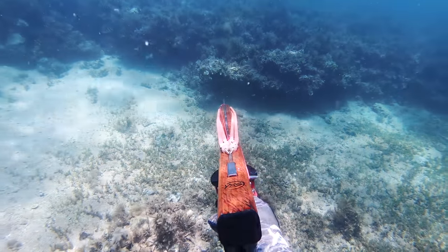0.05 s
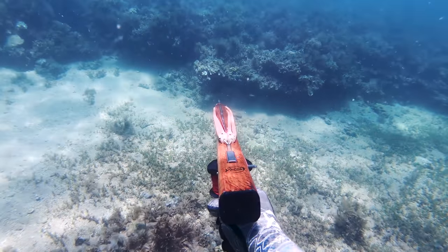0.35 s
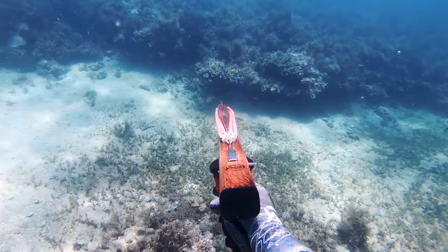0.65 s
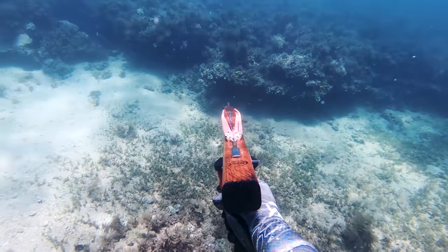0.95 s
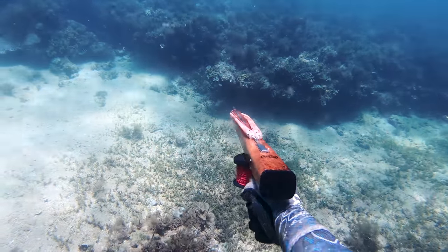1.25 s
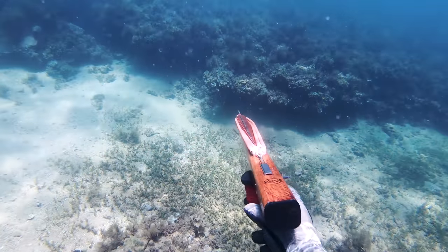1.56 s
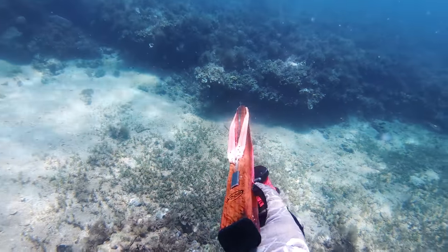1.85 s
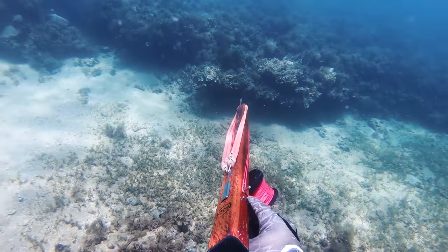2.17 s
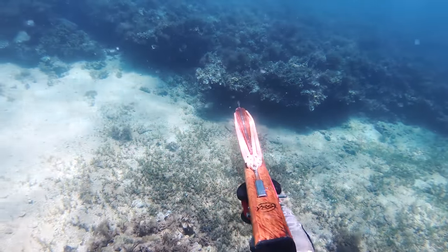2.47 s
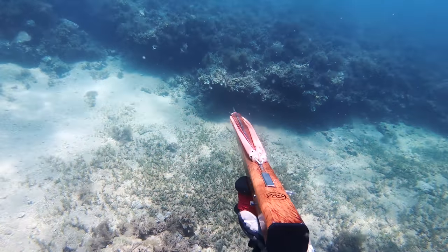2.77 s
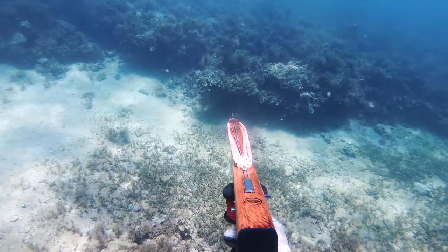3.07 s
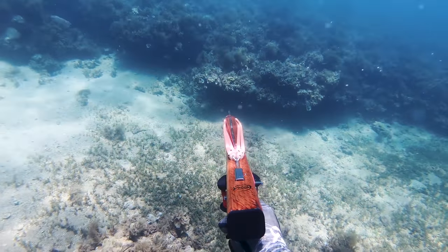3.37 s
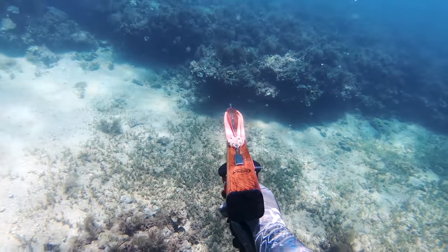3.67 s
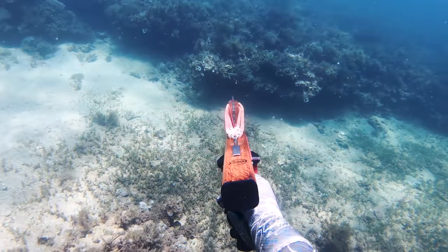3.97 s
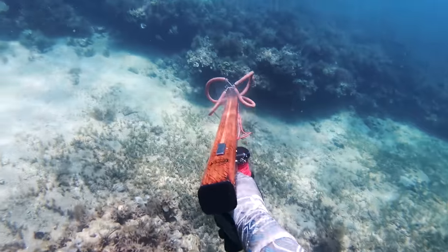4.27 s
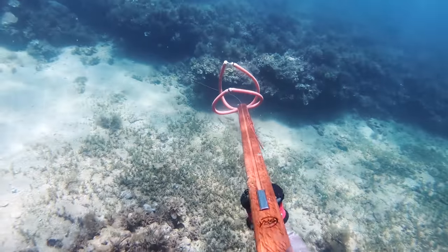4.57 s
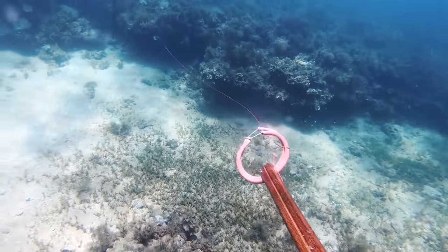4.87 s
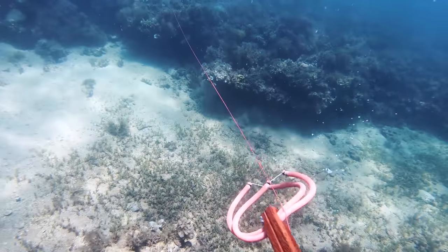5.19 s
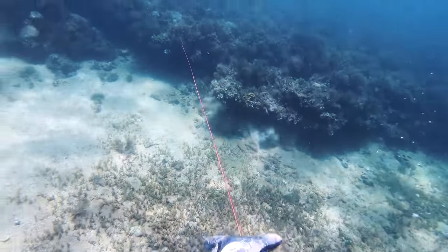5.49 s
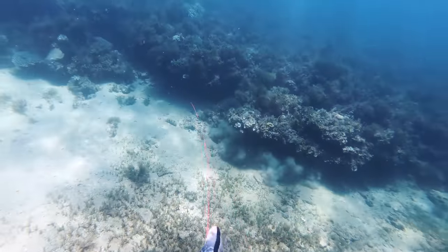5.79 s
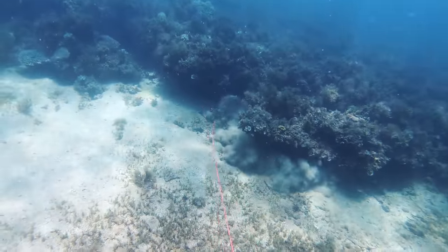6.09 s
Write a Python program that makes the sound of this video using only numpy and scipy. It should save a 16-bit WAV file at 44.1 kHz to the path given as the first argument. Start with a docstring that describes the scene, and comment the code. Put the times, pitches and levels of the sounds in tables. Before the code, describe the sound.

Underwater on a reef, a throbbing whine like a distant boat motor swells over low water rumble and faint snapping shrimp. Muffled bumps, a few clicks and glove scrapes come from handling a speargun. About four seconds in, it fires close by with a sharp crack, a metallic rattle and flapping rubber bands. The whine fades, heavier knocks and churning water follow, and the whine returns at the end, all heard through a sealed housing.

```python
"""Under water on a reef, a speargun is fired close to a camera in a sealed housing.
The trigger cracks, the shaft scrapes off its rail in a fizz of bubbles and the rubber bands flap.
A throbbing whine, like a far boat motor, excites the housing's resonances; it fades after the shot
and returns at the end. A glove sticks and slips on the stock, and the diver's moves bump the housing
and push water round it, more as the gun is drawn back. Shrimp snap by collapsing bubbles."""
import sys
import numpy as np
from scipy import signal
from scipy.fft import rfft, irfft
from scipy.io import wavfile
from scipy.ndimage import uniform_filter1d, minimum_filter1d

SR = 44100
rng = np.random.default_rng(int(sys.argv[2]) if len(sys.argv) > 2 else 0)


def wav_out(sig):
    """Save sig, one row per channel (or a flat mono array), as 16-bit PCM at SR to the path in sys.argv[1]."""
    wavfile.write(sys.argv[1], SR, np.round(np.clip(np.atleast_2d(sig).T, -1, 1) * 32767).astype(np.int16))


N = 275184
TIME, BINS = np.arange(N) / SR, np.fft.rfftfreq(N, 1 / SR)
OCTAVES = np.log2(np.clip(BINS, 1000, 12000) / 1000)  # axis of spectral tilts, 1 to 12 kHz
SHOT_S, CENTRING_S = 4.2705, 0.24  # the trigger lets go; the time handling sounds then take to centre
PLATEAU_DB, RETURN_S, RETURN_RISE_S = -20.0, 6.05, 0.11  # the whine's plateau and late return


# Spectrum of a hard contact: frequency_hz, level_db
CONTACT_SPECTRUM = [(200, -25.5), (600, -17), (850, 2), (1300, -3.5), (1900, -22.5), (2600, -28),
                    (4200, -40.5), (6000, -52), (9500, -65.5), (14000, -93)]
# Resonance of the gun: centre_hz, width_hz, gain_db
GUN_MODES = [(1130, 92, 7)]
# Contacts of trigger, shaft, wishbone and line, each with the struck part's resonance:
# start_s, length_s, peak_db, tilt_db_per_octave, ring_hz, ring_width_hz, ring_db
CONTACTS = [(0.908, 0.0023, -14, 1.5, 2594, 600, 13), (1.254, .016, -24, 4.5, 1467, 348, 10),
            (2.3019, .0005, -4.5, -4.5, 2213, 1000, 15.5), (2.3024, .0005, -6.5, -7, 1222, 90, 14.5),
            (4.268, 0.0026, 0.5, 1, 900, 148.8, 8.5), (4.2703, 0.0018, -2.5, 6, 997, 401, 8.5),
            (4.276, 0.014, -18.5, 3, 910, 201.5, 9.5), (4.287, 0.012, -3.5, -3.5, 1396, 398, 5),
            (4.291, 0.013, -9.5, -5, 546, 220.6, 22), (4.294, .011, -11, -1, 2256, 894, 11.5),
            (4.301, .004, -4.5, -2, 909, 70, 9.5), (4.305, 0.014, -19.5, -1, 1398, 399, 6),
            (4.3532, 0.008, -13.5, -5.5, 1904, 1098, 14), (4.37, 0.013, -27, 5, 895, 202, 9),
            (4.385, .003, -15, -1, 1295, 401, 6), (4.466, .0018, -18.5, -5, 2594, 601, 17.5),
            (4.463, .001, -21, -7.5, 964, 79.3, 11), (5.04, 0.0045, -32.5, 4.5, 1160, 271, 9.5),
            (5.0432, 0.0025, -16, -12, 1128, 45, 18.5), (5.346, 0.012, -53.5, 14.5, 1480, 340, 10.5),
            (5.841, 0.011, -51, 13.5, 3010, 700, 5)]
def clacks(chatter=0.29, density=.6, tick_s=0.0049):
    """Impact excitation: a tick and the chatter of sliding metal ring the gun and the struck part."""
    out, gun_db = np.zeros(N), spectrum(CONTACT_SPECTRUM) + resonances(GUN_MODES)
    for start_s, length_s, peak_db, tilt_db, ring_hz, width_hz, ring_db in CONTACTS:
        count = int(length_s * SR)
        tick = np.exp(-length_s / tick_s)  # long contacts are more rattle than tick
        force = chatter * (1 - tick) * sparse_noise(count, density) * signal.windows.tukey(count, .3)
        force[0] = tick
        response = impulse(gun_db + tilt_db * OCTAVES + resonances([(ring_hz, width_hz, ring_db)]))
        sound = signal.fftconvolve(force, response)
        add(out, start_s, gain_of(peak_db) * sound / abs(sound).max())
    return out


def recoil(flap_every_s=.035, flap_s=.038, flap_hz=122, strongest_s=0.077, fall_db_per_s=177):
    """Reaction: one kick, then the slack bands flap, building and dying. Rows are as in blows()."""
    kick = (SHOT_S, .034, -9, 124, -44)
    flaps = [(SHOT_S + age, flap_s, -17 - fall_db_per_s * abs(age - strongest_s), flap_hz, -np.inf)
             for age in flap_every_s * np.arange(1, 5)]
    return [kick] + flaps


def fizz(level_db=-61.5, fall_db_per_s=174, pops_per_s=2500):
    """Cavitation: tiny bubbles collapse behind shaft and bands in a quickly dying crackle."""
    pops = sparse_noise(N, pops_per_s / SR)
    crackle = unit_rms(convolved(pops, snap(ping_hz=7800, tilt_db=3)))
    return crackle * ramp(SHOT_S, .002) * gain_of(level_db - fall_db_per_s * since(SHOT_S))


# Runs of the line over the gun: start_s, length_s, level_db
LINE_DRAGS = [(5.674, .07, -68), (5.865, 0.12, -67)]
def line(ticks_per_s=400, spread_db=4):
    """Intermittent friction: the line drags over the stock in small, uneven ticks."""
    ticks = np.zeros(N)
    for start_s, length_s, level_db in LINE_DRAGS:
        count = int(length_s * SR)
        strength = gain_of(level_db + spread_db * rng.uniform(-1, 1, count))
        add(ticks, start_s, strength * (rng.random(count) < ticks_per_s / SR))
    return convolved(ticks, snap(ping_hz=7600, tilt_db=0))


# Pace of the throbbing: time_s, rate_hz
THROB_PACE = [(0, 15.55), (.5, 15.95), (1, 16.22), (2.1, 16.25), (2.6, 15.65), (3.2, 15.7), (3.7, 16),
              (4.3, 15.7), (5, 15.97)]
# Spectral envelope of the whine: frequency_hz, level_db
WHINE_SPECTRUM = [(60, -58.5), (230, -38.5), (370, -36.5), (520, -26), (740, -16), (830, -8), (1080, 0),
                  (1200, -3.5), (1560, -4.5), (1830, -27.5), (2700, -34), (4000, -52), (5800, -74),
                  (9000, -81.5), (11000, -92.5)]
# Narrow resonances of the housing: centre_hz, width_hz, gain_db
HOUSING_MODES = [(425.3, 25, 12), (565.2, 113, 16.5), (852.6, 83, 8), (1291.3, 33, 7.5), (2067, 140, 6),
                 (2495, 99, 5.5)]
# Slow change of the whine's upper band and whistle: time_s, relative_db
UPPER_BAND_LEVEL = [(0, -.5), (.9, -0.5), (2.1, -1.04), (2.85, -2.5), (3.2, 1.2), (3.8, 2), (4.3, 2),
                    (6.24, -1.5)]
def whine(upper_hz=(1150, 2000), upper_throb_db=0.95, thin_below_hz=650):
    """Source and filter: a throbbing drive rings the housing; the tone loses bass as it grows faint."""
    throbs = np.cumsum(follow(THROB_PACE)) / SR - .07
    response = impulse(spectrum(WHINE_SPECTRUM) + resonances(HOUSING_MODES))
    body = unit_rms(convolved(whine_drive(throbs), response))
    upper = irfft(rfft(body) / (1 + (upper_hz[0] / (BINS + 1)) ** 8 + (BINS / upper_hz[1]) ** 8), N)
    lower = low_passed(body, thin_below_hz, order=8)
    level_db = whine_level()
    upper_gain = gain_of(follow(UPPER_BAND_LEVEL) - 2.0 - upper_throb_db * np.sin(2 * np.pi * throbs))
    lower_gain = gain_of(np.clip(level_db - PLATEAU_DB, -16, 0))
    balanced = body + (upper_gain - 1) * upper + (lower_gain - 1) * lower
    return gain_of(level_db + 0.3) * (balanced + upper_gain * warble(throbs))


# Band where the chirps stand clear of the churning: centre_hz, width_hz, gain_db
CLEAR_BAND = [(555, 110, 1.5)]
def whine_drive(throbs, pitch_hz=196, harmonics=40, noisiness=1.53, throb_db=1.0, buzz_hz=63.4):
    """Amplitude modulation: chirps grow out of churning noise, and both throb, flutter and buzz."""
    clear_db = resonances(CLEAR_BAND)
    tone = tinted(chirps(throbs, pitch_hz, harmonics), clear_db) * ramp(0, 0.99)
    churn_rms = noisiness * np.sqrt(SR / 2 / (harmonics * pitch_hz))
    churn = churn_rms * tinted(rng.standard_normal(N), -2 * clear_db)
    flutter_db = 1.15 * drift(25)
    buzz = 1 + 0.13 * np.sin(2 * np.pi * buzz_hz * TIME)
    return (tone + churn) * gain_of(throb_db * np.cos(2 * np.pi * throbs) + flutter_db) * buzz


def chirps(throbs, pitch_hz, harmonics, fall=.13, stray=.025, waver=0.01996):
    """Gliding harmonic series: two interleaved trains of falling strokes, each two throbs long."""
    out = np.zeros(N)
    for offset, tune in ((0, 1), (.5, 1.04)):
        position = throbs / 2 + offset + 1.25
        stroke, age = position.astype(int), position % 1
        detune = 1 + stray * rng.standard_normal(stroke.max() + 1)[stroke]
        glide = 1 - fall * (2 * age - .5)
        turns = np.cumsum(pitch_hz * tune * detune * glide * (1 + waver * drift(60.4))) / SR
        phases = rng.random((harmonics, stroke.max() + 1))
        overtones = sum(np.cos(2 * np.pi * (k * turns + phases[k, stroke])) for k in range(2, harmonics))
        out += overtones * np.sin(np.pi * age) ** 2 * (1 - age) ** 2
    return out


# Strength of the whistle within the whine: time_s, relative_db
WHISTLE_LEVEL = [(0, -6), (.6, -6), (1.2, -9), (2.1, -8), (3.3, -9.5), (4.3, -7), (5, -8.5)]
def warble(throbs, pitch_hz=1440, fall_hz=310, stray_hz=35, fuzz_hz=70, lag_throbs=.22):
    """Frequency modulation: one falling whistle a throb, its spectral line broadened by noise."""
    age = (throbs - lag_throbs + .5) % 1
    hz = pitch_hz - fall_hz * (age - .5) + stray_hz * drift(16)
    carrier = np.exp(2j * np.pi * np.cumsum(hz) / SR)
    fuzz = 1 + .45 * (drift(fuzz_hz) + 1j * drift(fuzz_hz))
    return gain_of(follow(WHISTLE_LEVEL)) * unit_rms((carrier * fuzz).real * np.sin(np.pi * age) ** 4)


def whine_level(swell_db=11, swell_s=0.58, drop_db=12.5, dip_db=8.5, dip_s=0.19, return_db=-28.5):
    """Amplitude envelope in dB: a swell, a drop and brief dip at the shot, a fade, a return."""
    age = since(SHOT_S)
    db = PLATEAU_DB - swell_db * np.exp(-TIME / swell_s)
    db -= (drop_db + dip_db * np.exp(-age / dip_s)) * ramp(SHOT_S, 0.015)
    db -= 5 * age + 8.5 * age ** 2  # the fade quickens
    return db + (return_db - db) * ramp(RETURN_S, RETURN_RISE_S)


# Muffled blows on gun and housing: start_s, length_s, boom_db, rub_db
HANDLING_BLOWS = [(0.364, 0.025, -39, -46), (1.246, 0.05, -22.5, -36), (1.437, 0.044, -37.5, -53),
                  (1.73, 0.069, -25, -42.5), (2.033, 0.034, -39, -49.5), (2.302, 0.037, -24.5, -45.5),
                  (2.346, 0.051, -19.5, -51.5), (2.547, 0.05, -22.5, -39.5), (2.662, 0.098, -27.5, -43),
                  (2.778, .08, -34.5, -52), (2.85, 0.046, -31, -47), (2.89, 0.06, -19, -35),
                  (2.932, 0.036, -21.5, -46), (3.787, 0.028, -39, -55), (4.666, 0.038, -31.5, -51.5),
                  (4.808, 0.086, -32, -33), (5.029, 0.083, -35.5, -32), (5.103, 0.0115, -28, -38),
                  (5.139, 0.036, -33, -37), (5.285, 0.029, -32, -36.5), (5.342, 0.058, -11, -27),
                  (5.65, 0.055, -30, -36), (5.8416, 0.00814, -6, -15), (5.876, 0.073, -21, -29.5),
                  (6.139, 0.048, -24.5, -39.5)]
def blows(base_hz=121, loaded_hz=5.2, stiffen_hz_s=0.97, sag_hz_per_db=1.5, heavy_db=-22.5):
    """Short, light blows boom higher. Returns rows of start_s, length_s, boom_db, pitch_hz, rub_db."""
    rows = []
    for start_s, length_s, boom_db, rub_db in HANDLING_BLOWS:
        gun_hz = base_hz + loaded_hz * (start_s < SHOT_S)  # stretched bands stiffen the gun
        pitch_hz = gun_hz + stiffen_hz_s / length_s - sag_hz_per_db * max(boom_db - heavy_db, 0)
        rows.append((start_s, length_s, boom_db, pitch_hz, rub_db))
    return rows + recoil() + bumps()


def bumps(per_s=7, length_s=.03, pitch_hz=101, steepness=1.5, pivot_db=-38, spread_db=4):
    """Random impacts: small bumps grow as a power of the water's flow. Rows are as in blows()."""
    jitter, softness = rng.random((int(per_s * N / SR) - 1, 2)).T
    starts_s = (np.arange(len(jitter)) + jitter) / per_s
    flow_db = np.interp(starts_s, *np.transpose(FLOW_LEVEL))
    typical_db = pivot_db + steepness * (flow_db - pivot_db) + 3.5
    levels_db = typical_db - spread_db * (np.log(softness + 0.026) + 1)
    return [(start_s, length_s, db, pitch_hz, db - 16) for start_s, db in zip(starts_s, levels_db)]


# Rubbing noise within a blow: frequency_hz, density_db
RUB_SPECTRUM = [(100, -17.5), (200, -0.5), (330, 3), (430, -4), (600, -25.5), (800, -37.5), (1200, -51),
                (5000, -120)]
def thumps(sway=0.24, rise=.26, wobble=0.15, roughness=0.22):
    """Damped vibration: each blow swells and dies as a juddering boom with a subharmonic and rubbing."""
    out, rub = np.zeros(N), noise(RUB_SPECTRUM)
    waver, judder = 1 + wobble * drift(90), 1 + roughness * drift(71)
    for start_s, length_s, boom_db, pitch_hz, rub_db in blows():
        span = slice(int(start_s * SR), int((start_s + 3 * length_s) * SR))
        rise_s = rise * length_s
        age = (TIME[span] - TIME[span][0]) / rise_s
        swell = (age * np.exp(1 - age)) ** 1.16
        turns = np.cumsum(pitch_hz * waver[span]) / SR - pitch_hz * rise_s
        boom = judder[span] * (np.cos(2 * np.pi * turns) + sway * np.sin(np.pi * turns))
        add(out, start_s, swell * (gain_of(boom_db - 1) * boom + gain_of(rub_db + 0.5) * rub[span]))
    return out


# Response of the housing to a blow: frequency_hz, gain_db
KNOCK_RESPONSE = [(250, -46), (430, -14.5), (560, 13), (700, 13.5), (900, 10), (1300, 11), (2500, -8)]
def housing_ring(knocks):
    """Forced resonance: blows raise a woody midrange ring, which fades and returns with the whine."""
    return convolved(knocks, impulse(spectrum(KNOCK_RESPONSE))) * gain_of(whine_level() - PLATEAU_DB)


# Scrapes of the glove on the stock: start_s, length_s, level_db, centre_hz
GLOVE_SCRAPES = [(1.232, .045, -36, 525), (1.721, 0.054, -35.5, 473), (2.287, 0.022, -37, 398),
                 (2.553, 0.026, -35.5, 619), (2.661, .03, -35.5, 722), (2.701, 0.023, -33.5, 405),
                 (2.875, 0.044, -25, 777), (2.906, 0.025, -26, 512), (2.917, 0.036, -32, 610)]
def scrapes(slips_per_s=900, relative_width=.6):
    """Stick-slip friction: quick slips of the glove on the wood excite one broad resonance."""
    out = np.zeros(N)
    for start_s, length_s, level_db, centre_hz in GLOVE_SCRAPES:
        count = int(length_s * SR)
        slips = sparse_noise(count, slips_per_s / SR) * signal.windows.tukey(count, .7)
        ring_db = -20 * np.log10(1 + ((BINS - centre_hz) / (relative_width * centre_hz)) ** 4)
        sound = signal.fftconvolve(slips, impulse(np.maximum(ring_db, -90), size=1024))
        add(out, start_s, gain_of(level_db) * sound / np.sqrt(np.sum(sound ** 2) / count + 1e-20))
    return out


# Rubbing of the glove on the handle: frequency_hz, density_db
GRIP_SPECTRUM = [(60, -26), (105, -2), (135, 4), (200, -16.5), (320, -9.5), (480, -15.5), (800, -32.5),
                 (2000, -88)]
# Shifts of the hand's grip: start_s, length_s, level_db
GRIP_SHIFTS = [(.24, 0.16, -45), (1.203, .18, -40), (1.638, 0.21, -42.5), (2.473, 0.31, -43),
               (2.761, 0.27, -42.5)]
def grips(slips_per_s=220):
    """Frictional creep: the glove moves over the handle in uneven slips, a low, rough rubbing."""
    out, slips = np.zeros(N), sparse_noise(N, slips_per_s / SR)
    rubbing = unit_rms(convolved(slips, impulse(spectrum(GRIP_SPECTRUM))))
    for start_s, length_s, level_db in GRIP_SHIFTS:
        stroke = rubbing[int(start_s * SR):int((start_s + length_s) * SR)]
        add(out, start_s, gain_of(level_db) * stroke * signal.windows.tukey(len(stroke), .6))
    return out


# How hard the diver's movement pushes water round the housing: time_s, level_db
FLOW_LEVEL = [(0, -40.5), (.8, -40.5), (1.02, -45), (1.3, -36), (1.55, -36), (1.75, -47), (2.4, -46),
              (3.4, -48), (3.8, -49.5), (4.8, -42.5), (5.45, -37.5), (6.03, -30), (6.24, -38)]
# Rumble, close eddies, gurgle and hiss of the water: frequency_hz, density_db
RUMBLE_SPECTRUM = [(15, 3), (35, 1.5), (65, -5.5), (110, -13), (160, -25.5), (230, -35.5), (500, -70.5),
                   (2000, -130)]
EDDY_SPECTRUM = [(30, -28), (65, -3.5), (100, 2.5), (150, -7.5), (300, -43.5), (1000, -110)]
GURGLE_SPECTRUM = [(40, -23), (110, -2.5), (160, -9), (215, -15.5), (270, 1), (330, -2), (400, -8),
                   (500, -21.5), (590, -7.5), (700, -34.5), (900, -26.5), (1300, -43), (2100, -44),
                   (5000, -110)]
HISS_SPECTRUM = [(1060, -45.5), (1800, -12), (1870, -14), (2050, -11.5), (2160, -23), (2590, -20.5),
                 (2820, -3), (3000, -1.5), (3250, -6.5), (3630, -9), (3950, -19.5), (5140, -53.5),
                 (8690, -120)]
def flow(draw_back_s=4.15, drawn_s=5.75, surge_db=-26, surge_fall_db_per_s=71, eddy_db=-5):
    """Turbulence: lumpy water noise follows the movement and surges with the recoil, over a faint hiss."""
    push_db = follow(FLOW_LEVEL)
    close = ramp(draw_back_s, drawn_s - draw_back_s)  # the gun is drawn back beside the camera
    surge = ramp(SHOT_S, 0.0085) * gain_of(surge_db - surge_fall_db_per_s * since(SHOT_S))
    width = 0.28 * np.array([[1], [-1]]) * (1 - close) ** 2  # narrows to the centre
    rumble = noise(RUMBLE_SPECTRUM) + width * noise(RUMBLE_SPECTRUM)
    rumble += gain_of(eddy_db) * ramp(SHOT_S, CENTRING_S) * noise(EDDY_SPECTRUM)
    rumble *= gain_of(1.96 + 2.4 * drift(39)) * np.hypot(gain_of(push_db), surge)
    gurgle_db = -53 + 12 * close + 0.18 * (push_db - push_db.mean())
    gurgle = noise(GURGLE_SPECTRUM) * gain_of(gurgle_db + 0.39 * drift(25))
    hiss = noise(HISS_SPECTRUM) * gain_of(-94 + 21 * close)
    return rumble + gurgle + hiss


# Snaps of the nearest shrimp: start_s, level_db, ping_hz, tilt_db_per_octave
NEAR_SNAPS = [(0.2662, -50, 3670, -1.5), (0.693, -54, 8600, 0), (0.8594, -61, 3200, 7.5),
              (1.2468, -38, 3650, -1), (1.507, -57, 4700, 2), (1.5247, -50, 3420, 0.5),
              (1.839, -49.5, 3100, -1.5), (1.91, -47.5, 3400, -7), (2.1056, -52, 3500, -5),
              (2.296, -50, 2800, 3), (2.446, -61.5, 8640, 0), (2.488, -38, 4500, -10),
              (2.5391, -57, 6700, -3.5), (3.1824, -60, 3300, -1), (3.6676, -53, 3600, -1.5),
              (3.734, -41, 3930, -9), (3.8721, -49, 4500, -8.5), (4.2605, -55, 6800, -1),
              (4.9144, -66, 3000, -1), (5.03, -66, 4700, -4), (5.933, -59, 3600, 1),
              (5.9924, -62, 3900, -6)]
def shrimp(boost_db=3, rattle=0.41, rattle_s=0.0027):
    """Multipath: near snaps and the reef's crackle reach each channel with a short rattle of its own."""
    out = reef()
    for start_s, level_db, ping_hz, tilt_db in NEAR_SNAPS:
        add(out, start_s, gain_of(level_db + boost_db) * snap(ping_hz, tilt_db))
    paths = rattle * rng.standard_normal((2, 400)) * np.exp(-TIME[:400] / rattle_s)
    paths[:, 0] = 1  # direct arrival
    return np.array([convolved(out, path) for path in paths])


# Spectrum of a collapsing bubble: frequency_hz, level_db
SNAP_SPECTRUM = [(500, -20.5), (1500, -4.5), (2600, 3.5), (4300, 0.5), (5600, -8.5), (7000, -13.5),
                 (9200, -13), (11000, -37.5), (15000, -52)]
def snap(ping_hz, tilt_db, width_hz=1200, ping_db=6.5):
    """Bubble collapse: a broadband click with one resonant ping, at peak 1."""
    ping = resonances([(ping_hz, width_hz, ping_db)])
    sound = impulse(spectrum(SNAP_SPECTRUM) + tilt_db * OCTAVES + ping, size=512)
    return sound / abs(sound).max()


def reef(far_db=-71.5, snaps_per_s=140, spread_db=2.5, clumping=0.92, clump_hz=9, animals=6):
    """Poisson process of drifting rate: far shrimp crackle in clusters; the level follows the whine's."""
    rate = np.exp(clumping * drift(clump_hz))
    fired = rng.random(N) < snaps_per_s / SR * rate / rate.mean()
    level_db = far_db + spread_db * np.minimum(rng.exponential(1, N), 3.5)
    pops = fired * gain_of(level_db + whine_level() - PLATEAU_DB)
    animal = rng.integers(0, animals, N)
    pings_hz, tilts_db = np.geomspace(2500, 5000, animals), 2 * rng.standard_normal(animals)
    return sum(convolved(pops * (animal == k), snap(pings_hz[k], tilts_db[k])) for k in range(animals))


def sea_bed(x, echo_db=-13.5, t60_s=0.068):
    """Scattering: the sea bed adds a short, dense tail."""
    age = TIME[:SR // 4]
    tail = rng.standard_normal(len(age)) * gain_of(-60 * age / t60_s)
    return x + gain_of(echo_db) * convolved(x, tail / np.linalg.norm(tail))


# Phase between the two channels: frequency_hz, left_lead_rad
STEREO_PHASE = [(0, -2.5), (340, 1.94), (600, 2), (1030, 3), (1290, 4), (1810, 4.5), (2070, 4), (2330, 5),
                (2670, 5), (2930, 4.5), (3360, 6), (3700, 7.5)]
# Balance of the two channels: frequency_hz, left_minus_right_db
STEREO_BALANCE = [(60, 3.5), (87, -2.5), (130, -1), (180, 0.5), (260, 0.5), (380, -13), (550, -9), (800, 2),
                  (1150, -0.5), (1670, 3), (2420, -2.5), (3500, -0.5)]
def widened(x):
    """Wide, out-of-phase midrange: left and right differ in phase and level."""
    lean = gain_of(spectrum(STEREO_BALANCE) / 2) * np.exp(.5j * spectrum(STEREO_PHASE))
    pair = np.array([lean, 1 / lean])
    return irfft(rfft(x) * pair / np.sqrt(np.mean(abs(pair) ** 2, axis=0)), N)


def hollowed(x, start_s=4.4, start_hz=377.5, octaves_per_s=1.2, width_hz=220, depth=0.84):
    """Cancellation: a hollow notch climbs through what both channels share, until the whine returns."""
    centre_hz = start_hz * 2 ** (octaves_per_s * since(start_s))
    carrier = np.exp(2j * np.pi * np.cumsum(centre_hz) / SR)
    pole = np.exp(-np.pi * width_hz / SR)
    band = 2 * (carrier * signal.lfilter([1 - pole], [1, -pole], x.mean(0) / carrier)).real
    return x - depth * (ramp(start_s, 0.026) - ramp(RETURN_S, RETURN_RISE_S)) * band


def gain_of(db):
    """Decibels as an amplitude ratio."""
    return 10 ** (np.asarray(db) / 20)


def unit_rms(x):
    """Normalises to rms 1."""
    return x / np.sqrt(np.mean(x ** 2) + 1e-20)


def ramp(start_s, length_s):
    """Linear rise from 0 to 1."""
    return np.clip((TIME - start_s) / length_s, 0, 1)


def since(start_s):
    """Seconds elapsed since a moment, zero before it."""
    return np.maximum(TIME - start_s, 0)


def follow(points):
    """Interpolates (time_s, value) points at every sample."""
    return np.interp(TIME, *np.transpose(points))


def spectrum(points):
    """Interpolates (frequency_hz, value) points at every bin, on a log-frequency axis."""
    hz, value = np.transpose(points)
    return np.interp(np.log(BINS + 1), np.log(hz + 1), value)


def resonances(modes):
    """Lorentzian peaks, in dB to add to a spectrum."""
    return sum(db / (1 + ((BINS - hz) / (width_hz / 2)) ** 2) for hz, width_hz, db in modes)


def add(mix, start_s, sound):
    """Superposes a sound on the mix, in place."""
    part = mix[max(round(start_s * SR), 0):][:len(sound)]
    part += sound[:len(part)]


def impulse(db, size=4096, fft_size=8192):
    """Minimum-phase impulse response of a body with this spectrum."""
    db = np.interp(np.fft.rfftfreq(fft_size, 1 / SR), BINS, db)
    log_gain = np.log(gain_of(np.r_[db, db[-2:0:-1]]))
    return np.fft.ifft(np.exp(signal.hilbert(log_gain).conj())).real[:size]


def convolved(x, response):
    """Convolution, cut to the scene's length."""
    return signal.oaconvolve(x, response)[:N]


def low_passed(x, edge_hz, order):
    """Zero-phase low-pass filter."""
    return irfft(rfft(x) / (1 + (BINS / edge_hz) ** order), N)


def tinted(x, db):
    """Spectral shaping, at rms 1."""
    return unit_rms(irfft(rfft(x) * gain_of(db), N))


def noise(points):
    """Gaussian noise with this spectrum, at rms 1."""
    return tinted(rng.standard_normal(N), spectrum(points))


def sparse_noise(count, chance):
    """Impulses of Gaussian strength, with this chance at each sample."""
    return rng.standard_normal(count) * (rng.random(count) < chance)


def drift(hz):
    """Slow random fluctuation of rms 1, rolling off above this rate."""
    return tinted(rng.standard_normal(N), -np.minimum((BINS / hz) ** 2, 100))


def scene(lean_db=3):
    """Superposition: what rings through the housing joins shrimp, line, water and handling."""
    knocks = thumps()
    housing = widened(whine() + sea_bed(clacks()) + fizz() + scrapes() + housing_ring(knocks))
    thuds = low_passed(knocks, edge_hz=620, order=6)  # glove and water pass only the thud
    # handling sounds lean right, then move to the centre after the shot
    lean = gain_of(lean_db * np.array([[-.5], [.5]]) * (1 - ramp(SHOT_S, CENTRING_S)))
    return hollowed(housing + shrimp() + line() + flow() + lean * (thuds + grips()))


def record(dry, ceiling=.93, edge_hz=15500):
    """Peak limiting: a quick gain dip holds peaks under full scale; a low-pass then limits the band."""
    needed_gain = ceiling / np.maximum(abs(dry).max(0), ceiling)
    gain = uniform_filter1d(minimum_filter1d(needed_gain, size=129), size=129)
    limited = dry * gain * signal.windows.tukey(N, .001)
    low_pass = signal.firwin(255, edge_hz, window=("kaiser", 9), fs=SR)
    return signal.oaconvolve(limited, low_pass[None], "same")


dry = scene()
out = record(dry)
wav_out(out)
```